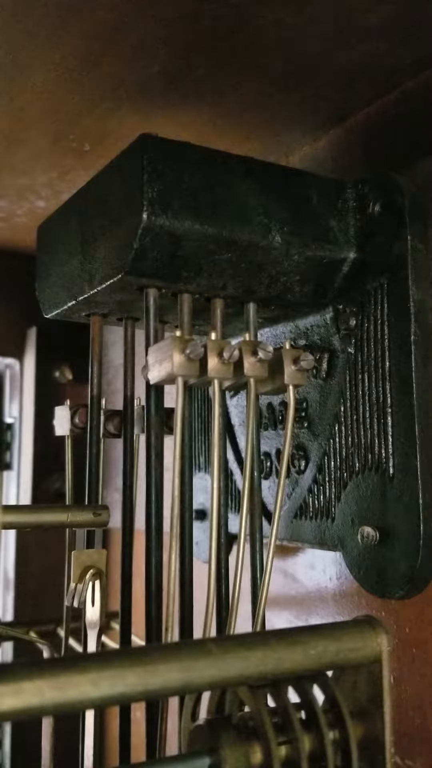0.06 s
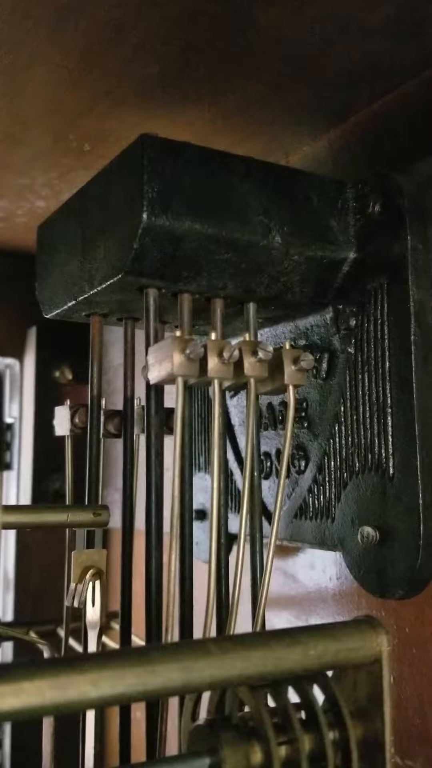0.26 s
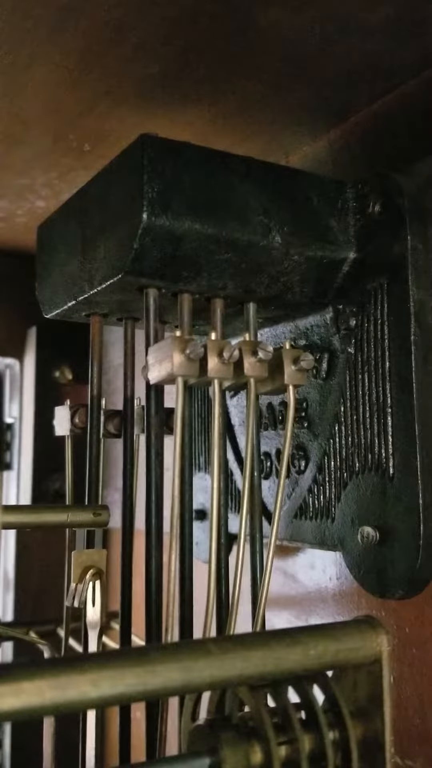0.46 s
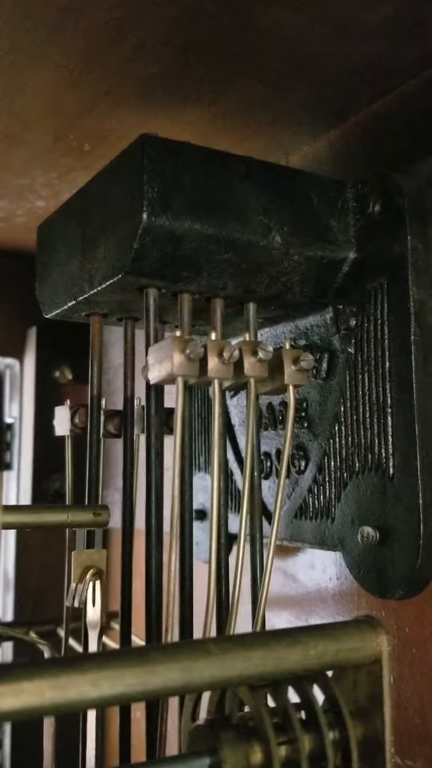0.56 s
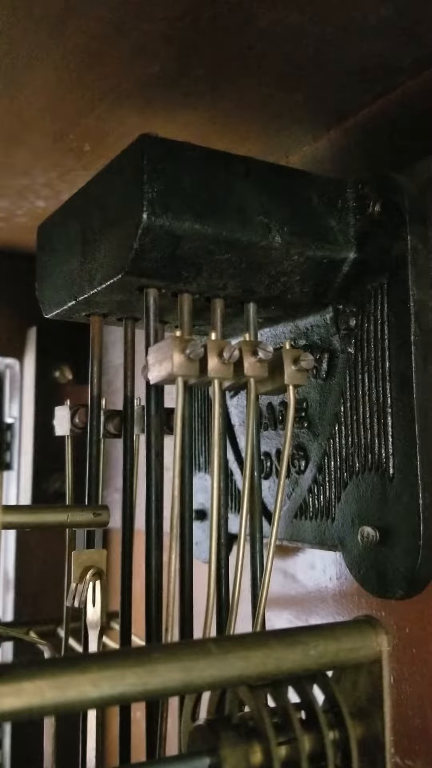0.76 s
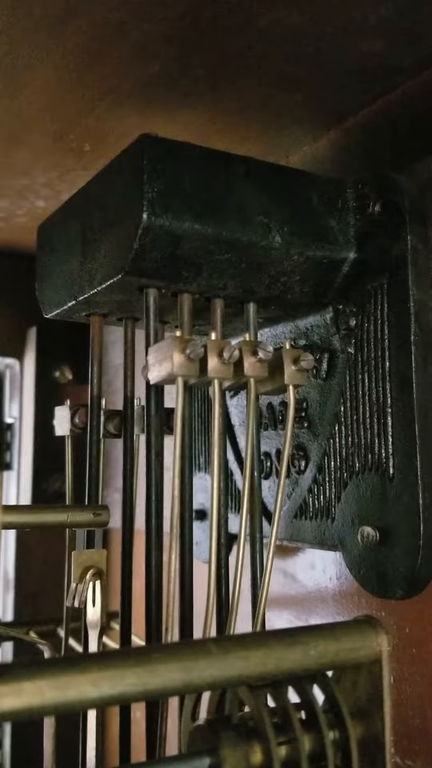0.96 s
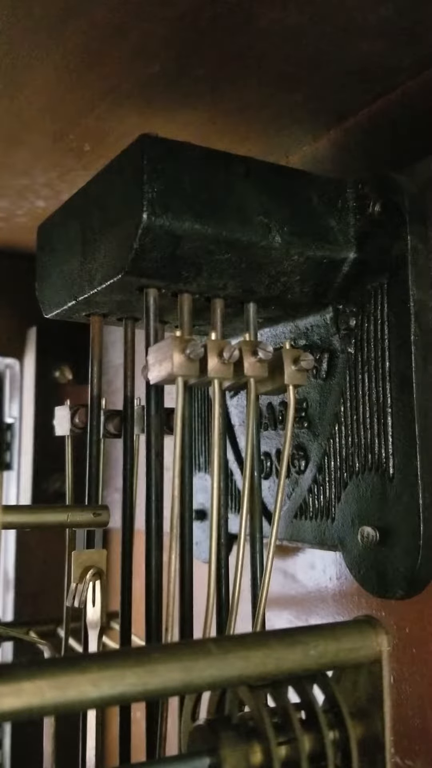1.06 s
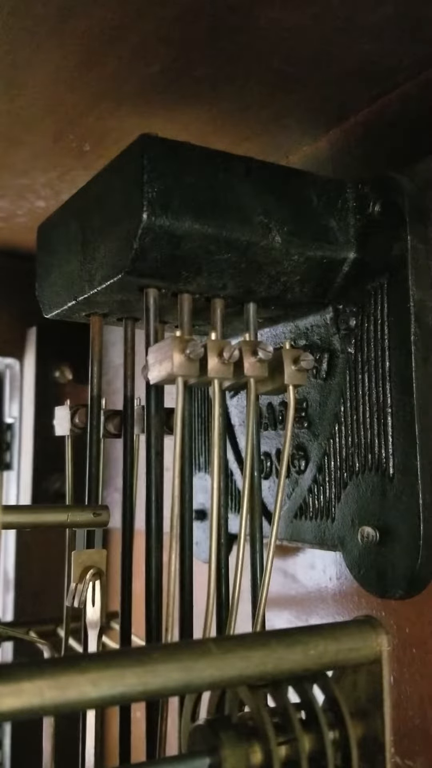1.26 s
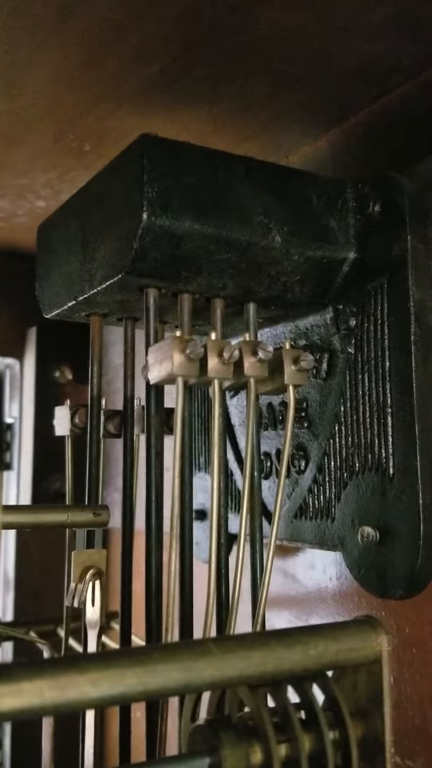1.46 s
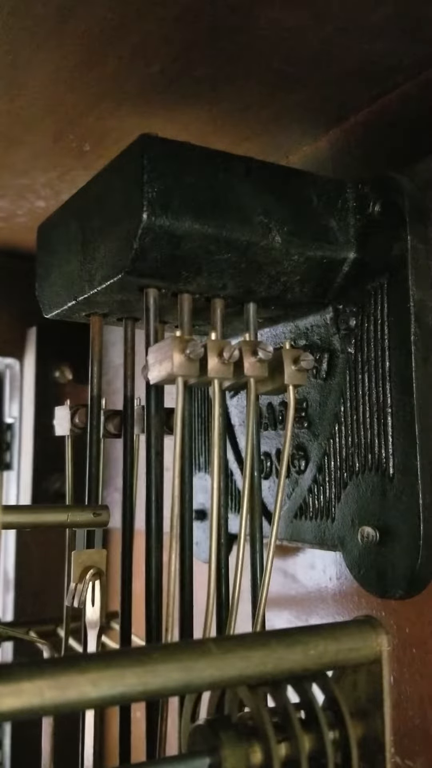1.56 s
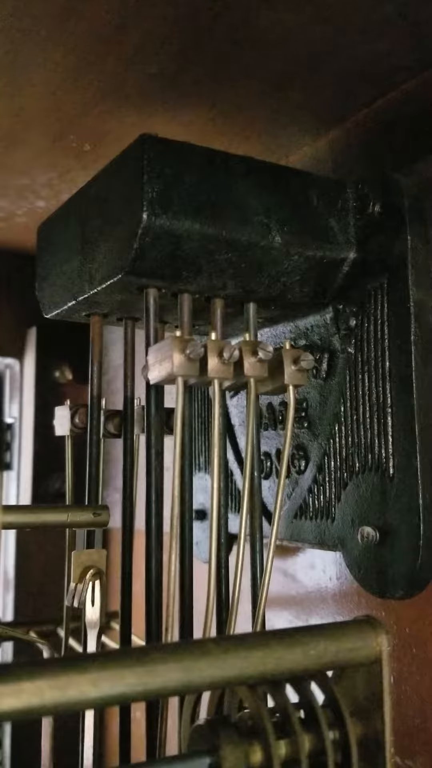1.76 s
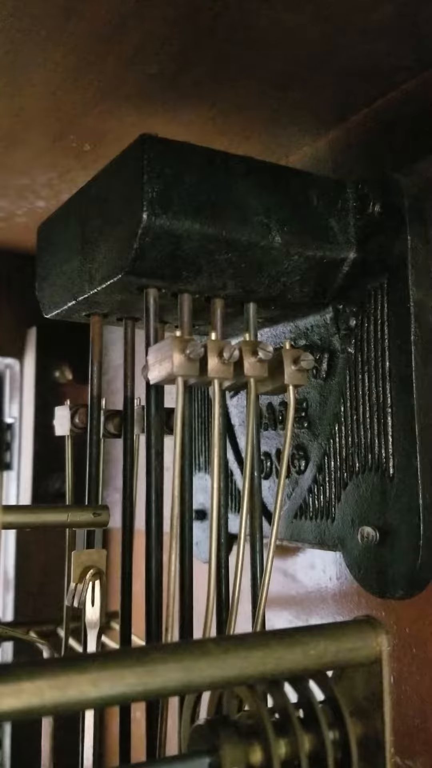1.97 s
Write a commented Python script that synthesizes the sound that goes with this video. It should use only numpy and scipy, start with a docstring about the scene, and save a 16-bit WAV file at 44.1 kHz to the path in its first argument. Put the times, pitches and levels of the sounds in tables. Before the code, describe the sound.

Clock movement sounds close up: a wooden knock, a bright clack, then an accelerating gear whirr.

```python
"""The movement of a striking clock, heard close up in its wooden case. First a hand rubs the case and
a knock rings the wood; small parts tick and dull thumps come from below. Then a lever slides with a thin
hiss, drops with a bright clack and frees the gear train, whose teeth ring the wheels faster and faster
into a whirr. Room tone and a deep rumble lie underneath."""
import sys
import numpy as np
from scipy import signal
from scipy.fft import rfft, irfft
from scipy.io import wavfile

SR = 44100
rng = np.random.default_rng(int(sys.argv[2]) if len(sys.argv) > 2 else 0)


def to_wav(sig):
    """Store sig (one row per channel, or 1-D mono) as 16-bit WAV at the path in sys.argv[1].

    Samples outside -1..1 are clipped; the rate is SR.
    """
    pcm = np.clip(np.atleast_2d(sig), -1, 1) * 32767
    pcm = np.round(pcm).astype(np.int16)
    wavfile.write(sys.argv[1], SR, pcm.T)  # frames by channels


N = 88200
TIME = np.arange(N) / SR
HZ = np.maximum(np.arange(N // 2 + 1) * SR / N, 1.0)


def amp(db):
    """Decibels to gain."""
    return 10 ** (np.asarray(db, float) / 20)


def unit(x):
    """Scale to rms 1."""
    return x / np.sqrt(np.mean(x ** 2) + 1e-20)


def pan(db):
    """Stereo gains for a balance of left over right."""
    return amp(np.outer([.5, -.5], db))


def fader(rows):
    """A gain curve for each level column; silent outside its times."""
    s, *columns = np.transpose(rows)
    return [amp(np.interp(TIME, s, db, -200, -200)) for db in columns]


def at_hz(points, hz=HZ):
    """Read a curve on a log frequency axis."""
    freqs, values = np.transpose(points)
    return np.interp(np.log(hz), np.log(freqs), values)


def noise(colour, apart_db=1, apart_from_hz=890):
    """Spectrum of a coloured noise of rms 1; scatter in the case widens it above the bass."""
    centre = rfft(rng.standard_normal(N))
    sides = amp(apart_db) * rfft(rng.standard_normal((2, N))) / (1 + (apart_from_hz / HZ) ** 2)
    eq = amp(at_hz(colour)) * (HZ > colour[0][0]) * (HZ < colour[-1][0])
    return rfft(unit(irfft((centre + sides) * eq)))


def clicks(s, db):
    """One-sample impulses at the given times and levels."""
    out = np.full(N, 1e-18)
    np.add.at(out, np.clip((np.asarray(s) * SR).astype(int), 0, N - 1), amp(db))
    return out


def dying(hits, t60, attack_s=.0012):
    """Envelope: each hit adds power that builds quickly and dies away."""
    attack = np.ones(int(attack_s * SR)) / int(attack_s * SR)
    return np.sqrt(signal.lfilter(attack, [1, -amp(-120 / (t60 * SR))], hits ** 2))


def ring(x, hz, t60):
    """Resonator: a unit click starts a decaying sine of height 1."""
    r, w = amp(-60 / (t60 * SR)), 2 * np.pi * hz / SR
    return signal.lfilter([0, np.sin(w)], [1, -2 * r * np.cos(w), r * r], x)


def strike(s, db, modes, spread_db=2.0):
    """Each blow hits each mode with its own strength; neighbouring modes swing opposite ways."""
    return sum(ring(clicks(s, db + level + rng.normal(0, spread_db, len(s))) * (-1) ** k, hz, t60)
               for k, (hz, level, t60) in enumerate(modes))


def crack(hits, colour, decay):
    """Noise bursts with a decay time for each octave."""
    spectrum = noise(colour)
    out = 0
    for hz in 250 * 2.0 ** np.arange(7):
        octave = np.clip(1 - abs(np.log2(HZ / hz)), 0, 1)
        out += irfft(spectrum * octave) * dying(hits, at_hz(decay, hz))
    return out


# colour of the room (frequency [Hz], relative density [dB])
ROOM_COLOUR = [(60, -28), (108, -2), (217, -9.5), (330, -23.5), (500, -34.5), (900, -52), (1300, -46.5),
               (2500, -59), (3600, -55.5), (4400, -47.5), (5300, -60), (7000, -69), (12000, -61.5),
               (16000, -63.5)]
# its balance (frequency [Hz], left over right [dB])
ROOM_PAN = [(60, 4.5), (150, -1.5), (380, -1.5), (950, -5), (2380, 0.5), (5980, 6), (15000, -3)]
# likeness of its two sides (frequency [Hz], likeness [0-1])
ROOM_LIKENESS = [(60, 0.72), (180, 0.98), (550, 0.72), (1650, 0.027), (4970, 0.035), (15000, 0.01)]
# swell of its low end (time [s], level [dB])
ROOM_LOW_FADER = [(0.0, -69), (0.53, -46.5), (1.1, -57.5), (1.57, -54.5), (2.0, -58)]


def room_tone(split_hz=630, top_db=-63):
    """A bed of air: a wavering low end under a steady, wide top."""
    alike = at_hz(ROOM_LIKENESS)
    mid = np.sqrt(1 + alike) * noise(ROOM_COLOUR)
    side = np.sqrt(1 - alike) * noise(ROOM_COLOUR) * [[1], [-1]]
    tone = (mid + side) * pan(at_hz(ROOM_PAN))
    low = tone / (1 + (HZ / split_hz) ** 2)
    return fader(ROOM_LOW_FADER)[0] * unit(irfft(low)) + amp(top_db) * unit(irfft(tone - low))


# swell of the rumble (time [s], relative level [dB])
RUMBLE_FADER = [(0.0, -54), (0.16, -59), (0.43, -53), (0.78, -63), (1.42, -59), (2.0, -63.5)]


def rumble(band_hz=(37.5, 91)):
    """Deep noise comes through the case."""
    bandpass = signal.butter(2, band_hz, "band", fs=SR, output="sos")
    deep = unit(signal.sosfilt(bandpass, rng.standard_normal(N)))
    return amp(4) * fader(RUMBLE_FADER)[0] * deep * pan(-2.4)


# modes of the wooden case (frequency [Hz], relative level [dB], t60 [s])
CASE_MODES = [(46.7, -2.5, 0.3), (108.8, -1, 0.16), (151.2, -7, 0.79), (230.1, 4.5, 0.17),
              (272.9, -5, 0.32), (316.8, -4.5, 0.32), (357.5, -8, 0.28), (464, -19.5, 0.14),
              (521.4, -9.5, 0.15), (583, -14, 0.36), (642, -6, 0.13), (847, -11, 0.12), (1057, -14, 0.33)]
# hand strokes before and after the knock (time [s], wood level [dB], relative rustle level [dB])
RUB_STROKES = [
    [(0.0, -43.5, -54.5), (0.03, -52, -62.5), (0.092, -52, -58.5), (0.12, -87, -100), (0.142, -76, -93),
     (0.185, -87, -96)],
    [(0.31, -32.5, -57), (0.424, -40.5, -51), (0.45, -53.5, -61), (0.542, -37.5, -37.5),
     (0.586, -44, -51.5), (0.63, -40, -40.5), (0.644, -37.5, -48), (0.786, -43.5, -49.5),
     (0.854, -63.5, -55), (0.93, -73, -65)],
]


def wood_murmur(tilt_db_per_octave=-3.13, panel_boost_db=8.5):
    """Rubbing keeps the wood murmuring, with extra drive on the big panel."""
    murmur = 0
    for k, (hz, level, t60) in enumerate(CASE_MODES[1:]):
        drive_db = tilt_db_per_octave * np.log2(hz / 150) + panel_boost_db * (k == 1)
        murmur += amp(level + drive_db) * ring(rng.standard_normal(N), hz, t60)
    return fader(np.vstack(RUB_STROKES))[0] * unit(murmur)


# colour of hand on wood (frequency [Hz], relative density [dB])
RUSTLE_COLOUR = [(240, -44), (400, 6), (636, 6), (921, -1), (4050, -11.5), (6340, -20), (7400, -23),
                 (9180, -43), (12100, -24), (16000, -37)]


def hand_rustle():
    """The same strokes give a rustle of friction."""
    return amp(-6.5) * fader(np.vstack(RUB_STROKES))[1] * irfft(noise(RUSTLE_COLOUR))


# the knock and its bounces (time [s], relative level [dB])
KNOCKS = [(0.2059, -23), (.221, -26.5), (.2385, -25), (0.2478, -30), (0.293, -42), (0.317, -43)]
# colour of the crack (frequency [Hz], relative density [dB])
KNOCK_COLOUR = [(240, -53), (400, -7), (708, -5), (935, -18), (1560, -15), (1790, -21.5), (4240, -25),
                (7510, -33.5), (9320, -51.5), (12300, -45), (16000, -57)]
# its decay (frequency [Hz], t60 [s])
KNOCK_DECAY = [(400, 0.34), (1500, 0.23), (4000, 0.19), (8000, 0.11), (15000, 0.76)]
# modes of a metal part (frequency [Hz], relative level [dB], t60 [s])
CLINK_MODES = [(3370, -15, 0.027), (4250, -9.5, 0.016), (4810, -16, 0.023)]


def knock(crack_db=-5.5, crack_db_per_db=11):
    """A blow rings the wood and jolts a metal part; weaker bounces lose their crack far faster."""
    s, db = np.transpose(KNOCKS)
    body = signal.lfilter([.12], [1, -.88], strike(s, db, CASE_MODES))  # low-pass
    clink = strike(s[:1] + [.002, .005], db[0], CLINK_MODES)
    hits = clicks(s, db[0] + crack_db + crack_db_per_db * (db - db[0]))
    return body + clink + crack(hits, KNOCK_COLOUR, KNOCK_DECAY)


# ticks in the handled case (time [s], relative level [dB], pitch [Hz], left over right [dB])
TICKS = [(0.4135, -54, 4120, -9), (0.468, -49.5, 1510, -9), (0.507, -48, 7380, -21.5),
         (.521, -48, 3970, -12), (0.5368, -38.5, 1486, -4), (0.608, -57, 2130, -12), (0.6294, -63, 3600, 1),
         (0.6625, -51, 3700, -7), (0.6946, -50, 4250, -8), (0.8251, -47, 1794, -14.5)]
# modes of the small parts (frequency [Hz], relative level [dB], t60 [s])
SMALL_PART_MODES = [(2584, -21, 0.07), (3784, -19.5, 0.071), (4250, -18, 0.096), (4820, -19, 0.028),
                    (5690, -14, 0.023), (7440, -33, 0.029)]


def ticks(ring_db=-6, puff_db=-9.5, width_octaves=.8):
    """Each tick is a short note, a jingle of small parts and a puff of noise around its pitch."""
    hiss = rfft(rng.standard_normal((2, N))) * (HZ < 16000)
    out = np.zeros((2, N))
    for s, db, hz, pan_db in TICKS:
        hit = clicks([s], db)
        note = amp(ring_db) * ring(hit, hz, t60=.076)
        jingle = strike([s], db, SMALL_PART_MODES, spread_db=10.5)
        band = np.exp(-(np.log2(HZ / hz) / width_octaves) ** 2 / 2)
        puff = amp(puff_db) * unit(irfft(hiss * band)) * dying(hit, t60=.075)
        out += (note + jingle + puff) * pan(pan_db)
    return out


# blows from below (time [s], relative level [dB], pitch [Hz])
THUMPS = [(0.485, -31.5, 88), (0.519, -38, 54.7), (0.956, -37, 73), (0.994, -38.5, 56.6),
          (1.038, -38.5, 59.4), (1.082, -45, 44.8), (1.47, -28, 173), (1.864, -47, 103), (1.977, -45.5, 48)]


def thumps(t60_cycles=19.2):
    """Soft blows each ring one low note, dulled by a low-pass."""
    notes = sum(ring(clicks([s], db), hz, t60_cycles / hz) for s, db, hz in THUMPS)
    return signal.lfilter([1.3e-4], [1, -2 * .992, .992 ** 2], notes) * pan(-2.6)


# modes of a small spring (frequency [Hz], relative level [dB], t60 [s])
SPRING_MODES = [(5200, -5, .04), (7400, -2, .06), (10500, -6, .08), (11930, -2, .07), (14250, -9, .13)]


def spring_ping():
    """One tick rings a spring, off to the right."""
    return strike([.5076], -47, SPRING_MODES) * amp([[-5], [4]])


# travel of the lever (time [s], level [dB])
SLIDE_FADER = [(1.14, -97), (1.158, -64.5), (1.172, -59.5), (1.256, -71), (1.264, -61)]
# colour of its friction (frequency [Hz], relative density [dB])
SLIDE_COLOUR = [(2350, -53), (4000, -30), (4310, -12), (5380, -7), (7660, -6), (8850, -14), (11500, -5),
                (12700, 7.5), (14800, 1), (16000, 4)]


def lever_slide():
    """The sliding lever gives a thin hiss."""
    return fader(SLIDE_FADER)[0] * irfft(noise(SLIDE_COLOUR))


# the drop and its bounces (time [s], level [dB], relative send to the plates [dB])
CLACKS = [(1.2663, -27, -20), (1.2677, -21.5, -53), (1.2733, -17, -6.5), (1.2769, -22.5, -0.5),
          (1.284, -42.5, 13.5), (1.2997, -27.5, 7.5)]
# colour of the clack (frequency [Hz], relative density [dB])
CLACK_COLOUR = [(180, -4), (300, -9.5), (682, -11), (820, -20.5), (1930, -4.5), (2790, -14), (8580, -22.5),
                (9020, -29), (12400, -18), (15700, -26), (16500, -38)]


def lever_snap(above_hz=2500):
    """Attack of the clack: the lever lands and bounces in bright snaps."""
    s, db, _ = np.transpose(CLACKS)
    snap = irfft(noise(CLACK_COLOUR) * (HZ > above_hz)) * dying(clicks(s, db), t60=.02)
    hardest_contact = -np.diff(clicks([1.277], db=-24), prepend=0)
    return snap + hardest_contact


# decay of the clack's tail (frequency [Hz], t60 [s])
CLACK_DECAY = [(300, 0.7), (1500, 0.15), (4000, 0.2), (15000, 0.011)]
# modes of the movement's plates on their board (frequency [Hz], relative level [dB], t60 [s])
PLATE_MODES = [(220, -17.5, 0.53), (313, 3, 0.08), (354, -3.5, 0.2), (461, -8.5, 0.25), (639, -5, 0.12),
               (666, -7, 0.34), (1045, -10, 0.15), (1930, -34, 0.16), (2130, -7, 0.17), (2510, -41, 0.22)]


def lever_body(tail_db=-14.5):
    """Body of the clack: each landing rings the plates and leaves a noisy tail."""
    s, db, send_db = np.transpose(CLACKS)
    plates = strike(s, db + send_db - 10.5, PLATE_MODES)
    return plates + amp(tail_db) * crack(clicks(s, db), CLACK_COLOUR, CLACK_DECAY)


# run-up of the train (time [s], teeth meshed [count])
RUN_UP = [(1.3771, 0), (1.5091, 10), (1.61, 20), (1.6948, 30), (1.7683, 40), (1.8354, 50), (1.8975, 60),
          (1.9592, 70), (1.9995, 77)]
# the pinion's seven uneven leaves (accent [dB], extra accent on the top rings [dB])
PINION_LEAVES = [(0, 12.5), (0, 15), (0, 15), (1, 11), (0, 11), (0, 15.5), (0, -6)]
# rings of wheels and arbors (frequency [Hz], nominal width [Hz], relative level [dB])
WHEEL_MODES = [(965, 160, -5), (1720, 170, -2), (2485, 65, 5.5), (2620, 70, -2), (3140, 86, -4.5),
               (3970, 1050, -6.5), (5560, 820, -10.5), (7520, 410, -9.5), (11640, 980, -28.5),
               (13040, 350, -21)]
# swell of the whirr (time [s], relative level [dB])
WHIRR_FADER = [(1.36, -43), (1.374, -60), (1.49, -57.5), (1.51, -54.5), (1.77, -50.5), (1.778, -52),
               (1.932, -55), (2.0, -50)]
# colour of its hiss (frequency [Hz], relative density [dB])
WHIRR_COLOUR = [(180, -9), (300, 0.5), (1230, -17), (1690, -2.5), (2250, -14), (2520, 0), (3520, -5.5),
                (12700, -37), (14700, -24), (16000, -58)]
# swell of the board's hum (time [s], level [dB])
HUM_FADER = [(1.6, -71), (1.66, -54), (1.7, -53), (1.75, -54), (1.82, -49.5), (1.85, -75)]


def gear_train(jitter_s=.0011, steady_hiss_db=-1.5, top_from_hz=10000, contact_t60_s=.023):
    """Teeth mesh ever faster; each puffs hiss and rings the wheels, and the board hums along."""
    s, teeth = np.transpose(RUN_UP)
    tooth = np.arange(int(teeth[-1]) + 1)
    mesh_s = np.polyval(np.polyfit(teeth, s, 5), tooth) + rng.normal(0, jitter_s, len(tooth))
    leaf_db, top_db = np.array(PINION_LEAVES)[tooth % len(PINION_LEAVES)].T
    tooth_db = leaf_db + rng.normal(0, 1, len(tooth))
    top_db = top_db - 5 * np.clip(1 - tooth / 20, 0, 1)  # the top rings grow as the train gains speed
    start = int(s[0] * SR)
    puffs = np.r_[np.zeros(start), unit(dying(clicks(mesh_s, tooth_db), t60=.15)[start:])]
    rings = 0
    for hz, width, level in WHEEL_MODES:
        grit = rng.standard_normal(N)
        contact_db = tooth_db + top_db * (hz > top_from_hz) + rng.normal(0, .46, len(tooth))
        contacts = grit * dying(clicks(mesh_s, contact_db), contact_t60_s)
        rings += amp(level) * width * ring(contacts, hz, t60=3.7 / width)
    hum = fader(HUM_FADER)[0] * unit(ring(rng.standard_normal(N), hz=246.5, t60=.26))
    hiss = (puffs + amp(steady_hiss_db)) * irfft(noise(WHIRR_COLOUR))
    return amp(-9) * fader(WHIRR_FADER)[0] * (hiss + amp(1.61) * unit(rings)) + hum


def train_bump():
    """One soft bump of the running train rings low modes of the plates."""
    return strike([1.849], -53.5, PLATE_MODES[1:6])


# echo inside the case (frequency [Hz], level [dB])
ECHO_COLOUR = [(100, -24), (300, -14), (700, -9), (1200, -9), (3000, -10), (6000, -11), (15000, -10)]


def place(x, balance, left_lag_s=.0004515, echo_t60_s=.08):
    """Pan by frequency; above the bass the left lags, and each side has its own case echo."""
    decay = amp(-60 * TIME / echo_t60_s)
    echoes = np.array([unit(rng.standard_normal(N) * decay) for _ in range(2)]) / np.sqrt(N)
    lag_s = left_lag_s / (1 + (450 / HZ) ** 2)
    direct = np.array([np.exp(-2j * np.pi * HZ * lag_s), np.ones_like(HZ)])
    path = direct + amp(at_hz(ECHO_COLOUR)) * rfft(echoes)
    return irfft(rfft(x) * path * pan(at_hz(balance)))


# stereo image of the case (frequency [Hz], left over right [dB])
CASE_PAN = [(60, -1.5), (99, -6.5), (160, -1.5), (270, -4.5), (450, 4), (740, -1.5), (1220, -9), (2010, -5),
            (3330, 7.5), (5500, -7), (9080, -23), (15000, 2.5)]
# stereo image of the movement (frequency [Hz], left over right [dB])
MOVEMENT_PAN = [(60, -7), (92, 13), (140, -22), (210, -7.5), (330, -10.5), (500, -7), (770, -4.5),
                (1170, -12), (1790, -8.5), (2740, -4), (4190, -1), (6410, -16.5), (9810, -21), (15000, -5)]


def scene():
    """Case and movement arrive by their own paths; the movement rests until the lever slides."""
    lever = lever_snap() + lever_slide() + lever_body()
    gate = TIME > SLIDE_FADER[0][0]
    movement = place(lever + gear_train() + train_bump(), MOVEMENT_PAN) * gate
    case = place(wood_murmur() + knock() + hand_rustle(), CASE_PAN)
    return movement + case + ticks() + thumps() + spring_ping() + room_tone() + rumble()


def record(dry, stopband_hz=17100):
    """A steep low-pass cuts the very top."""
    return signal.sosfilt(signal.cheby2(12, 70, stopband_hz, fs=SR, output="sos"), dry)


dry = scene()
out = record(dry)
to_wav(out)
```